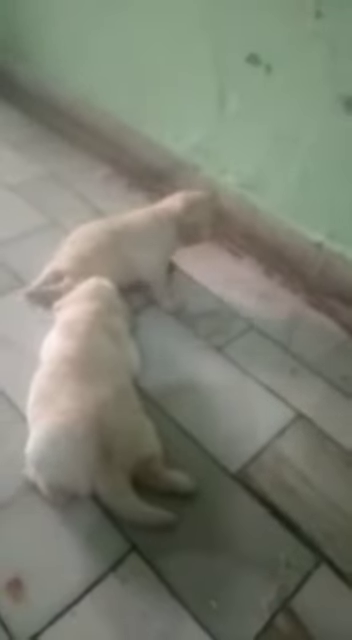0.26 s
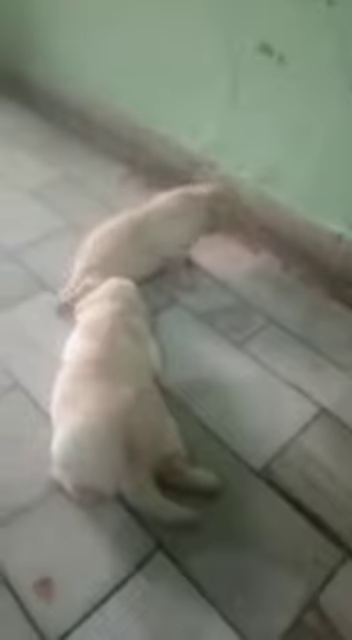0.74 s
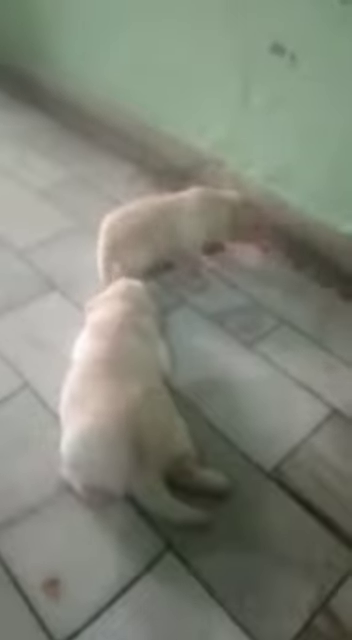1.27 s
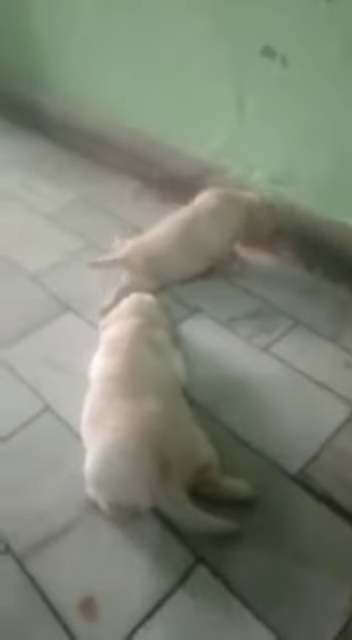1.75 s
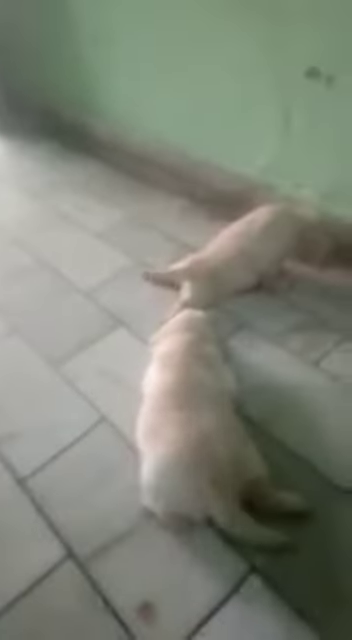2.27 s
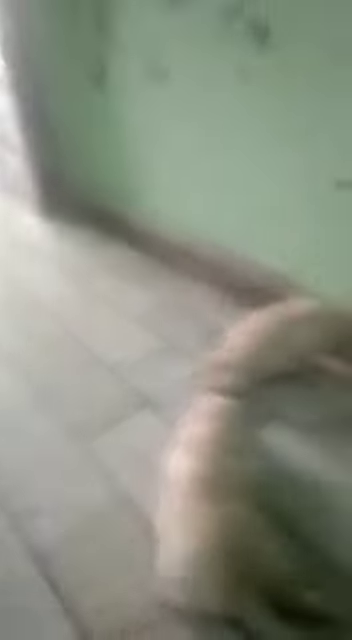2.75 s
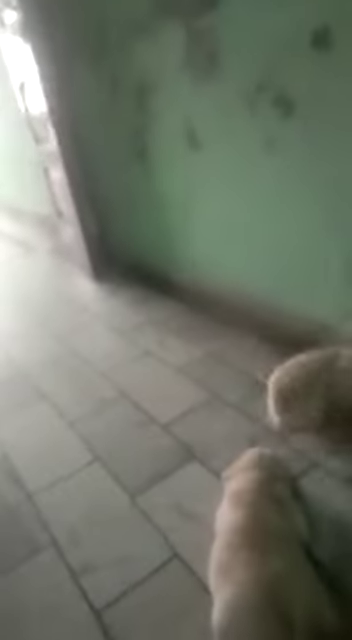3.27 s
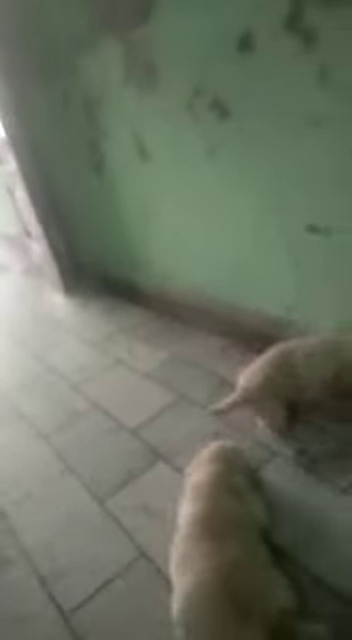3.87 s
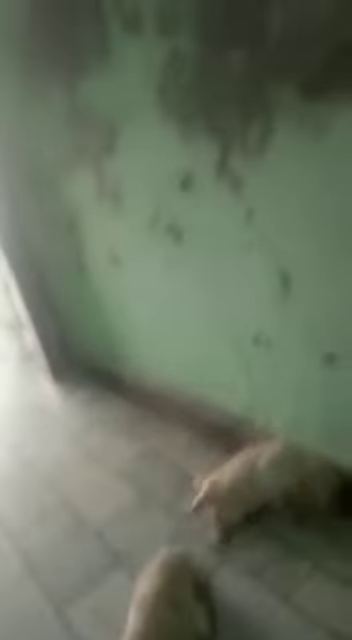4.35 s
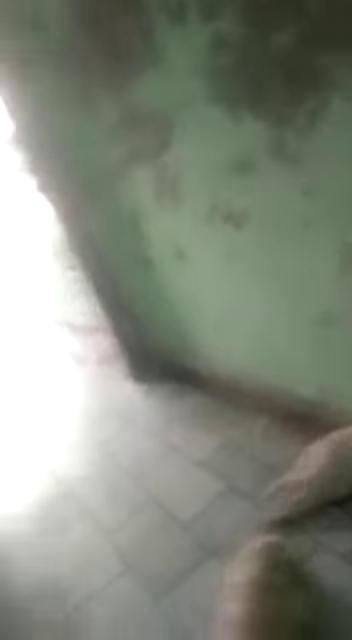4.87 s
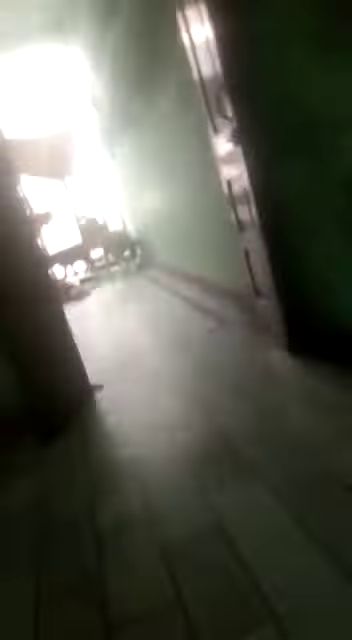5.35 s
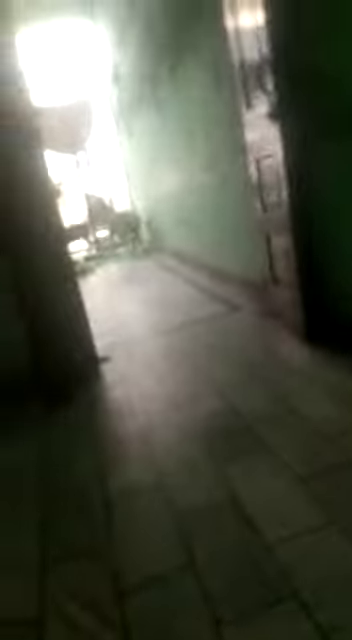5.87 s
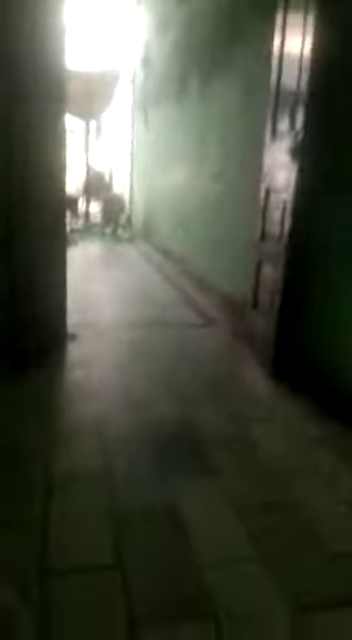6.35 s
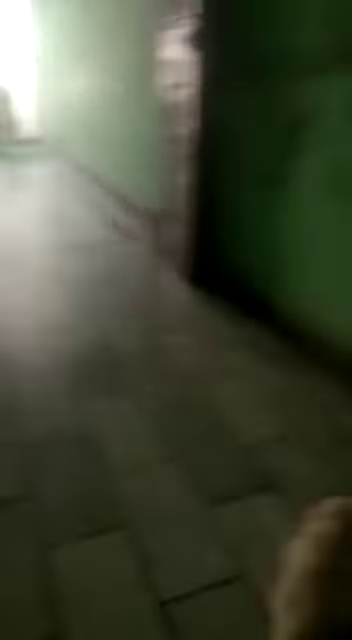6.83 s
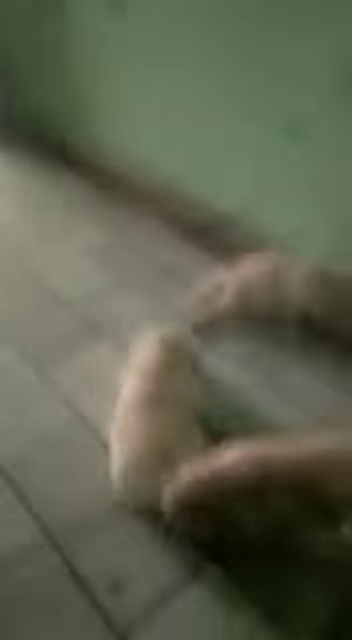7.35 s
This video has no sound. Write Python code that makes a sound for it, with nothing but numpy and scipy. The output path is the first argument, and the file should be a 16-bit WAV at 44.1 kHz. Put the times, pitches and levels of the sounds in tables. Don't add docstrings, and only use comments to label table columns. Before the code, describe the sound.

A puppy is already mid-yip at 0 s, ending at once over dull room tone and a faint, low motor hum. Paws drag softly; hushed whimpers come at about 0.5, 0.8 and 1.1 s, with a small bump and scratch near 0.6. Clear, loud yelps sweep up and fall at 1.4 and 1.8 s. Rough overlapping squeals at 2.2-2.45 s mix with scuffs and casing bumps, then high yelps follow at 2.6, 2.9 and 3.25. A thin whine wavers from 3.6 to 4.15, and a small whimper at 4.3. Higher, duller, more distant yelps come at 4.7, 5.05 (doubled), 5.4 and a long one at 5.9-6.2, with faint whimpers between. A soft closed-mouth yip falls at 6.35. Hum and room tone remain until sharp clicks and a hard thump on the phone at 7.2-7.3, then faint scuffing. Hard walls smear every cry; loud ones duck the background.

```python
import sys
import numpy as np
from scipy import signal
from scipy.fft import rfft, irfft, next_fast_len
from scipy.io import wavfile
from scipy.ndimage import uniform_filter1d, minimum_filter1d, map_coordinates

SR = 44100
rng = np.random.default_rng(int(sys.argv[2]) if len(sys.argv) > 2 else 0)


def attenuation_scalar(level_db):
    decades = np.asarray(level_db, float) / 20
    return 10 ** decades


def put_to_file(sound):
    columns = np.atleast_2d(sound).T
    safe = np.clip(columns, -1, 1)
    whole_steps = np.round(safe * 32767)
    wavfile.write(sys.argv[1], SR, whole_steps.astype(np.int16))


N = 335160


def unit(x):
    return x / np.sqrt(np.mean(x ** 2) + 1e-20)


def along(points, hz):
    point_hz, value = np.transpose(points)
    return np.interp(np.log(hz + 1), np.log(point_hz + 1), value)


def curves(rows, t):
    s, *columns = np.transpose(rows)
    return [np.interp(t, s, column) for column in columns]


def wobble(count, rate):
    knots = rng.standard_normal(int(count * rate / SR) + 4)
    return map_coordinates(knots, [np.arange(count) * rate / SR])


def filtered(x, response):
    size = next_fast_len(N + SR // 2)
    hz = np.fft.rfftfreq(size, 1 / SR)
    return irfft(rfft(x, size) * response(hz), size)[:N]


def rush(spectrum, patchy_db):
    z = signal.stft(rng.standard_normal(N), nperseg=512)[2]
    patches = uniform_filter1d(rng.standard_normal(z.shape), size=6, axis=0)
    patches = uniform_filter1d(patches, size=10, axis=1)
    noise = signal.istft(z * attenuation_scalar(patchy_db * unit(patches)), nperseg=512)[1][:N]
    return unit(filtered(noise, lambda hz: attenuation_scalar(along(spectrum, hz))))


def loudness_db(x, seconds):
    size = round(seconds * SR)
    power = uniform_filter1d(x ** 2, size=size, origin=(size - 1) // 2)
    return 10 * np.log10(np.abs(power) + 1e-12)


def cry(rows, voice, start, hoarse, hummed, pressed, far):
    # pitch_hz, level_db
    shut_throat = [(600, 16.5), (1500, -3), (2300, -22.5), (3500, -21), (4800, -18.5), (6000, -25.5),
                   (7500, -42.5), (8600, -41), (10500, -38), (15000, -96)]
    # pitch_hz, level_db
    wide_throat = [(600, -30.5), (1500, -14), (1900, 9.5), (2500, -1), (3150, -6.5), (4800, -8),
                   (6000, -9.5), (7900, -20), (8600, -42.5), (10500, -50.5), (15000, -76.5)]
    tongue_hz, tongue_width_hz = 3990, 814
    nose_hz, nose_width_hz = 5900, 2040

    t = np.arange(round(start * SR), round(rows[-1][0] * SR)) / SR
    pitch, effort_db = curves(rows, t)
    top_s = max(t[np.argmax(pitch)], 0)
    hoarse = hoarse + .12 * np.exp((t[0] - t) / .02)
    *opening, tongue_db, nose_db = voice
    mouth = np.interp(t, (rows[0][0], top_s, rows[-1][0]), opening)
    mouth = np.clip(mouth, -.3, 1.7)

    pitch = uniform_filter1d(pitch, size=800)
    pitch = pitch * (1 + (.003 + .03 * hoarse) * wobble(len(t), 110))
    pitch = pitch * (1 + np.minimum(t + .04, 0))
    if hummed:
        tongue_db = min(tongue_db, -7)

    k = np.arange(1, 13)[:, None]
    hz = k * pitch
    throat_db = (1 - mouth) * along(shut_throat, hz) + mouth * along(wide_throat, hz)
    throat_db = throat_db + tongue_db * np.exp(-((hz - tongue_hz) / tongue_width_hz) ** 2)
    throat_db = throat_db + nose_db * np.exp(-((hz - nose_hz) / nose_width_hz) ** 2)
    squeeze_db = 14 / (1 + (hz / 2250) ** 12) + 9 * np.exp(-((hz - 4400) / 450) ** 2)
    throat_db = throat_db - pressed * squeeze_db
    throat_db = throat_db - 7 * hummed / (1 + (6700 / hz) ** 16)
    fade_db = 72 * np.maximum(t - top_s, 0)
    throat_db = throat_db - fade_db / (1 + (3000 / hz) ** 4)
    throat_db = throat_db - 13.5 * far / (1 + (7000 / hz) ** 8)

    slow = signal.butter(4, 300, fs=SR, output='sos')
    flutter = signal.sosfilt(slow, rng.standard_normal(hz.shape))
    breath = 1 - hoarse / 2 + 9 * hoarse * np.sqrt(k) * flutter
    swing = np.sin(k * 2 * np.pi * np.cumsum(pitch) / SR + k * k / 3)
    tone = np.sum(attenuation_scalar(throat_db) * breath * swing, axis=0)
    edges = np.clip(np.minimum((t - t[0]) / 0.0035, (t[-1] - t) / 0.018), 0, 1)
    return attenuation_scalar(effort_db + 1.94) * edges * tone


def puppies():
    # time_s, pitch_hz, effort_db
    near_yelps = [
        [(1.352, 795, -34), (1.364, 903, -16), (1.388, 1202, -12), (1.41, 1284, -6), (1.437, 1328, -13.5),
         (1.462, 1265, -31.5), (1.49, 1077, -22), (1.525, 926, -20), (1.6, 805, -39.5)],
        [(1.752, 760, -31), (1.77, 838, -22), (1.805, 1153, -12), (1.84, 1224, -21), (1.87, 1171, -26),
         (1.91, 933, -25), (1.96, 832, -34), (2.04, 732, -56)],
        [(2.558, 850, -40), (2.575, 1019, -20), (2.6, 1231, -9), (2.63, 1366, -11), (2.66, 1379, -16),
         (2.7, 1370, -40)],
        [(2.872, 770, -30.5), (2.89, 999, -18.5), (2.912, 1279, -11.5), (2.95, 1369, -9.5), (3.0, 1403, -20),
         (3.04, 1314, -27), (3.08, 1000, -46)],
        [(3.232, 679, -30), (3.275, 1154, -27), (3.3, 1322, -11), (3.34, 1390, -15.5), (3.38, 1423, -21.5),
         (3.42, 1313, -24), (3.455, 1144, -32), (3.49, 622, -17)],
    ]
    far_yelps = [
        [(4.655, 1050, -33), (4.67, 1093, -18), (4.685, 1348, -7), (4.72, 1432, -8.5), (4.755, 1516, -1.5),
         (4.795, 1544, -17.5), (4.865, 1036, -52)],
        [(5.015, 810, -38.5), (5.035, 983, -19.5), (5.048, 1180, -10), (5.07, 1403, -2), (5.105, 1455, -2),
         (5.125, 1383, -39), (5.143, 1292, -12), (5.18, 1258, -18.5), (5.215, 1320, -54)],
        [(5.348, 1254, -25), (5.365, 1256, -15.5), (5.39, 1407, -9.5), (5.415, 1508, -8.5), (5.435, 1395, -4),
         (5.455, 1124, -28), (5.478, 820, -40)],
        [(5.9, 1036, -55), (5.915, 1167, -24), (5.935, 1375, -5), (5.96, 1429, 0.5), (5.985, 1589, -8.5),
         (6.02, 1659, -7.5), (6.09, 1662, -10.5), (6.12, 1590, -13), (6.17, 1455, -19)],
    ]
    whimpers = [
        [(0.51, 756, -58), (0.55, 640, -47), (0.6, 533, -33)],
        [(0.775, 745, -39.5), (0.81, 768, -32), (0.86, 814, -49.5), (0.93, 797, -51)],
        [(1.06, 907, -31), (1.08, 970, -30), (1.13, 1203, -33), (1.16, 980, -29), (1.18, 782, -31.5),
         (1.21, 730, -47)],
        [(4.3, 725, -32), (4.33, 826, -28), (4.36, 854, -24), (4.39, 778, -31), (4.44, 676, -29),
         (4.47, 740, -27)],
        [(4.885, 732, -34.5), (4.93, 705, -40.5), (4.98, 722, -38.5)],
        [(5.12, 724, -43), (5.19, 707, -46), (5.26, 678, -39)],
    ]
    whine = [
        [(3.632, 679.7, -26), (3.66, 900, -30), (3.69, 1138, -30.5), (3.75, 836.5, -25), (3.9, 1193, -34),
         (3.955, 1206, -30.5), (4.02, 952, -24.5), (4.09, 774, -26), (4.16, 674, -34)],
    ]
    yips = [
        [(0.0, 976, -26.5), (0.03, 1006, -27.5), (0.09, 966, -81)],
        [(6.33, 748, -23), (6.36, 945, -33.5), (6.4, 920, -30), (6.44, 833, -28), (6.48, 875, -53)],
    ]
    squeals = [
        [(2.165, 843, -35.5), (2.21, 875, -28.5), (2.243, 882, -21.5), (2.31, 872, -26.5)],
        [(2.21, 942, -52), (2.26, 945, -28), (2.3, 990, -26), (2.35, 1030, -28)],
        [(2.33, 1546, -26), (2.37, 1513, -15), (2.45, 1550, -24.5)],
    ]
    # mouth opening (0 shut, 1 wide) at the start, highest note
    # and end, tongue_ring_db, nose_ring_db
    voices = [(0.58, 0.87, 0.096, -5.5, 11), (0.53, 0.97, -0.43, -10.5, 11.5), (0.89, 0.83, .7, -7.5, 3.5),
              (0.88, 0.76, 0.25, -8, 10.5), (0.37, 0.26, 0.36, 3, 7), (0.27, 0.65, 0.76, 7.5, -3.5),
              (0.67, 0.55, 1.43, 4.5, -11), (0.44, 1, 0.96, -3.5, -12.5), (0.81, 0.25, 0.53, -4, 3.5),
              (0.099, 0, 0.37, -6, 22), (0.19, 0.044, 0.073, -33, 18), (0.3, .25, 0.21, -25, 11),
              (0.28, 0.46, 0.24, 6, 8.5), (0.36, 0.45, 0.32, -4, -27.5), (.1, 0.34, 0.48, -14, -12),
              (0.4, 0.27, 0.43, -7, 12.5), (0.64, 0.59, 0.57, -2.5, 8), (0.57, 0.19, 0.56, 12, -7),
              (1, 0.95, 1.1, 0, 13), (0.74, 0.95, .7, 5.5, 4), (0.95, 0.15, 0.89, -11.5, -1)]
    roughness = [.03, .05, .05, .05, .04, .04, .05, .13, .1, .15, .03, .04, .03, .04, .04, .045, .14, .1,
                 .15, .45, .45]
    lead_s = .12

    groups = [(near_yelps, False, False, False), (far_yelps, False, False, True),
              (whimpers, True, False, False), (whine, True, False, False),
              (yips, True, False, False), (squeals, False, True, False)]
    out = np.zeros(N + round(lead_s * SR))
    throats = iter(zip(voices, roughness))
    for cries, hummed, pressed, far in groups:
        for rows in cries:
            voice, hoarse = next(throats)
            start = rows[0][0]
            open_yip = start == 0
            if open_yip:
                start = -lead_s
            sound = cry(rows, voice, start, hoarse, hummed and not open_yip, pressed, far)
            out[round((start + lead_s) * SR):][:len(sound)] += sound
    return out


def corridor(x):
    # pitch_hz, t60_s
    walls = [(300, 0.13), (1500, 0.55), (3000, 0.57), (6000, 0.35), (9000, 0.32), (13000, 0.34)]
    hz, t, z = signal.stft(rng.standard_normal(SR), SR, nperseg=256)
    decay = attenuation_scalar(-60 * t / along(walls, hz)[:, None])
    tail = signal.istft(z * decay, SR, nperseg=256)[1]
    tail = tail * np.clip(np.arange(len(tail)) / SR / 0.0009, 0, 1)
    return signal.fftconvolve(x, tail / np.linalg.norm(tail))[:len(x)]


def background(heard):
    # time_s, level_db
    air = [(0, -44.5), (.8, -46), (2.1, -43), (2.4, -41.5), (2.8, -41), (2.95, -46.5), (3.2, -45.5),
           (3.5, -39.5), (3.85, -43.5), (4.55, -42.5), (4.75, -47.5), (5.25, -45), (5.4, -42.5),
           (6.4, -41.5), (7.15, -43), (7.6, -42)]
    # pitch_hz, level_db (per Hz)
    room_tone = [(15, -59), (25, -44.5), (80, -8.5), (124, -7), (187, -7), (335, -3), (427, -6.5),
                 (661, -6), (746, -8), (1130, -7.5), (2630, -11), (5450, -16.5), (6780, -52.5),
                 (8230, -43.5), (10700, -48.5), (18100, -120)]
    hum_hz, hum_width_hz, hum_db = 125.4, 9.8, -50.5
    duck_hz, duck_from_db, duck_share, duck_s = 1730, -35, 0.23, 0.19

    air_db, = curves(air, np.arange(N) / SR)
    low = filtered(heard, lambda hz: 1 / (1 + (hz / duck_hz) ** 8))
    air_db = air_db - duck_share * np.maximum(loudness_db(low, duck_s) - duck_from_db, 0)
    hum = filtered(rng.standard_normal(N), lambda hz: 1 / (1 + ((hz - hum_hz) / hum_width_hz) ** 4))
    sway = attenuation_scalar(1.1 * wobble(N, 7))
    tone = attenuation_scalar(-40.0) * sway * rush(room_tone, patchy_db=1.5)
    return attenuation_scalar(air_db + 44.5) * (tone + attenuation_scalar(hum_db) * unit(hum))


def paws(heard):
    # middle_s, length_s, drag_db, dust_hiss_db
    strokes = [(0.212, 0.27, -43.5, -64), (1.183, 0.23, -41, -65.5), (2.218, 0.049, -38.5, -59),
               (2.306, 0.22, -34.5, -84), (2.415, 0.032, -57.5, -53.5), (2.52, 0.024, -56.5, -69.5),
               (2.629, 0.052, -56, -64.5), (2.75, 0.065, -39.5, -64.5), (3.426, 0.23, -38.5, -73),
               (3.638, 0.041, -55, -61), (3.862, 0.19, -54, -76), (4.372, 0.13, -73, -75.5),
               (0.603, 0.08, -65, -90), (6.537, 0.1, -54.5, -80), (7.3, 0.086, -49, -64.5),
               (7.47, 0.12, -55, -75.5)]
    # pitch_hz, level_db (per Hz)
    drag_colour = [(400, -64), (1200, -15.5), (3000, -28.5), (5000, -4), (7000, -2), (8500, -23),
                   (11000, -36), (13000, -38)]
    # pitch_hz, level_db (per Hz)
    dust_colour = [(6000, -18), (10000, 16.5), (12500, -6.5), (14500, 11.5), (15400, -19)]

    middle, length, drag_db, dust_db = np.transpose(strokes)[:, :, None]
    t = np.arange(0, N, 50) / SR
    fade_db = -17 * np.maximum(np.abs(t - middle) / length - .5, 0)
    breath_rush = attenuation_scalar(loudness_db(heard, 0.01))
    drag = np.repeat(attenuation_scalar(drag_db + fade_db).sum(0), 50)[:N] + attenuation_scalar(-37.5) * breath_rush
    dust = np.repeat(attenuation_scalar(dust_db + fade_db).sum(0), 50)[:N] + attenuation_scalar(-58) * breath_rush
    drag = drag + attenuation_scalar(-59.5)
    grain = attenuation_scalar(0.73 * wobble(N, 130))
    scuff = drag * unit(grain * rush(drag_colour, patchy_db=1.2))
    hiss = dust * unit(grain * rush(dust_colour, patchy_db=3.0))
    return scuff + attenuation_scalar(-4.0) * hiss


def knocks():
    # middle_s, peak_db, pitch_hz
    thumps = [
        (0.572, -27, 300),
        (2.195, -18.5, 258),
        (2.363, -27, 254),
        (2.575, -23, 430),
        (2.85, -26.5, 169),
        (7.218, -27.5, 139),
        (7.2486, -13, 175),
        (7.258, -17.5, 76),
        (7.29, -29, 130),
    ]
    # start_s, peak_db, t60_s
    claw_ticks = [
        (.562, -33, 0.089),
        (2.356, -29, 0.012),
        (3.618, -33, 0.016),
        (6.006, -37, 0.0024),
        (7.23, -14, 0.0039),
        (7.243, -18, 0.0035),
        (7.25, -16.5, 0.011),
        (7.46, -39, 0.04),
    ]
    # pitch_hz, level_db
    claw_colour = [(300, 1.5), (2000, -2.5), (5000, -0.5), (7000, -4), (8500, -27), (15000, -34)]

    pushes, ticks = np.zeros(N + SR), np.zeros(N + SR)
    t = np.arange(SR // 10) / SR
    for s, db, hz in thumps:
        swing = (t - .02) * hz
        push = np.cos(2 * np.pi * swing) * np.exp(-(swing / .55) ** 2)
        pushes[round((s - .02) * SR):][:len(t)] += attenuation_scalar(db) * push
    for s, db, t60 in claw_ticks:
        ticks[round(s * SR):][:len(t)] += attenuation_scalar(db - 60 * t / t60) * rng.standard_normal(len(t))
    dull = filtered(pushes[:N], lambda hz: hz ** 2 / (hz ** 2 + 55 ** 2))
    dry_ticks = filtered(ticks[:N], lambda hz: attenuation_scalar(along(claw_colour, hz) + 5.5))
    return dull + dry_ticks


def scene():
    voices = puppies()
    heard = (attenuation_scalar(-2.5) * voices + attenuation_scalar(-3.5) * corridor(voices))[-N:]
    return (heard + background(heard) + paws(heard) + knocks())[None]


def low_pass(x):
    return signal.sosfilt(signal.butter(12, 15520, fs=SR, output="sos"), x)


def record(dry):
    need = np.minimum(1, .8 / (np.abs(dry) + 1e-9))
    gain = uniform_filter1d(minimum_filter1d(need, size=401), size=400)
    return low_pass(dry * gain)


dry = scene()
out = record(dry)
put_to_file(out)
```